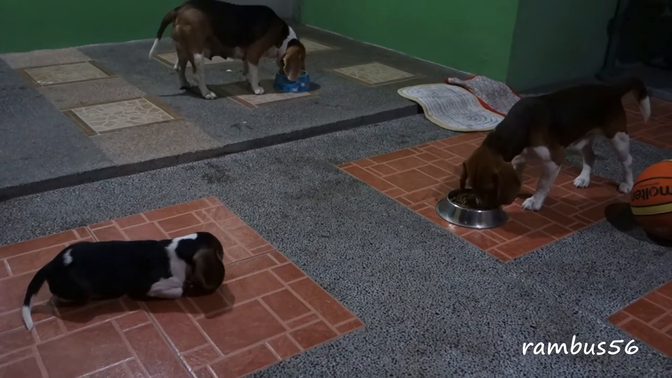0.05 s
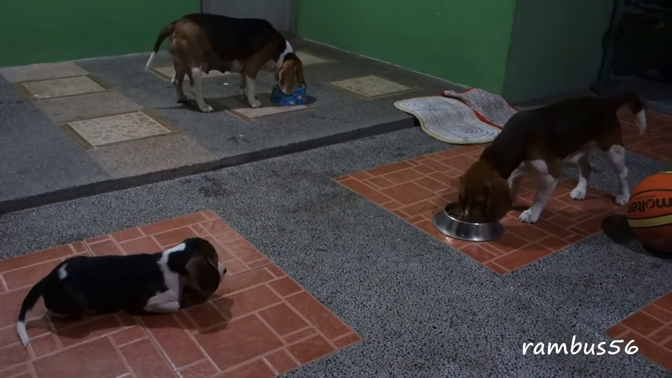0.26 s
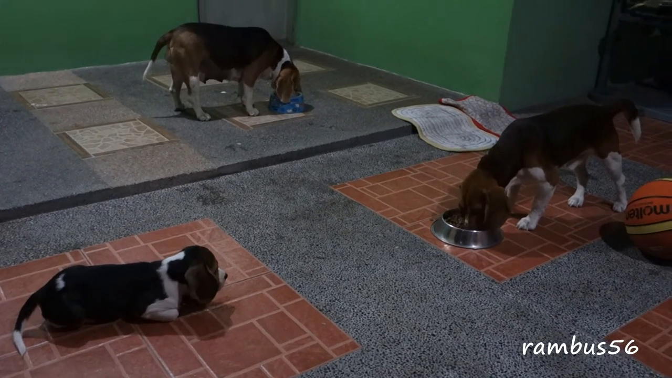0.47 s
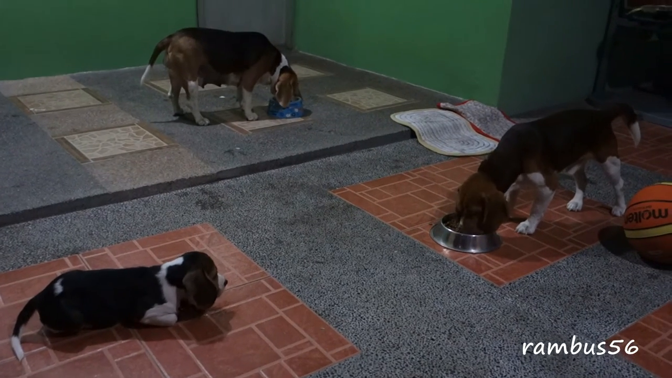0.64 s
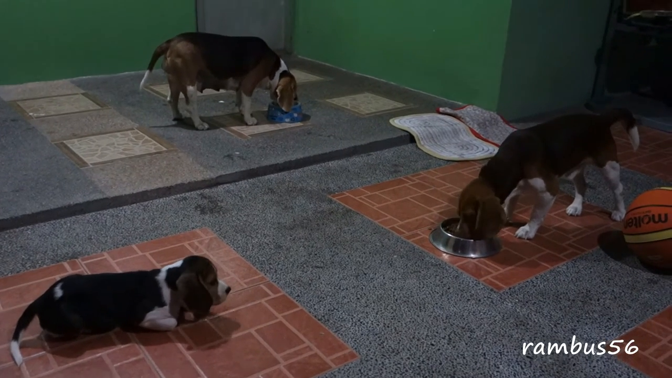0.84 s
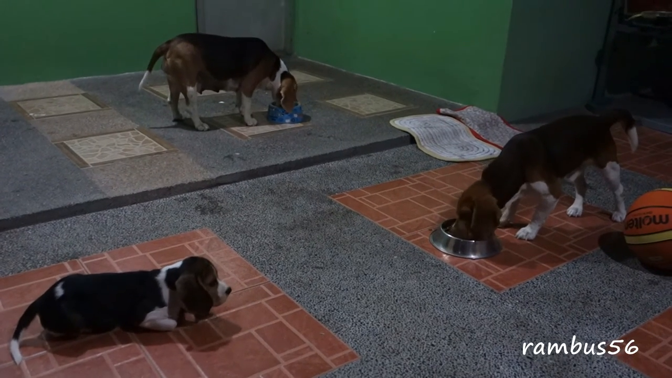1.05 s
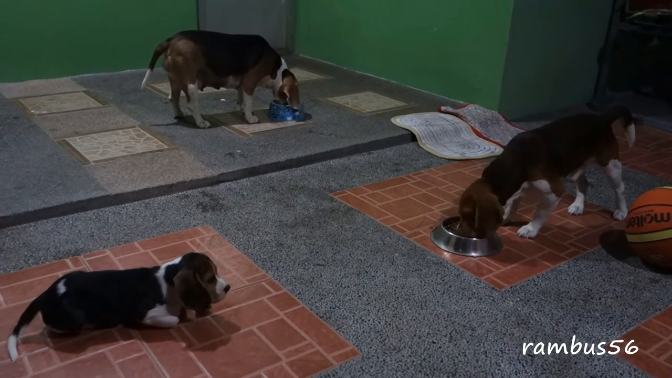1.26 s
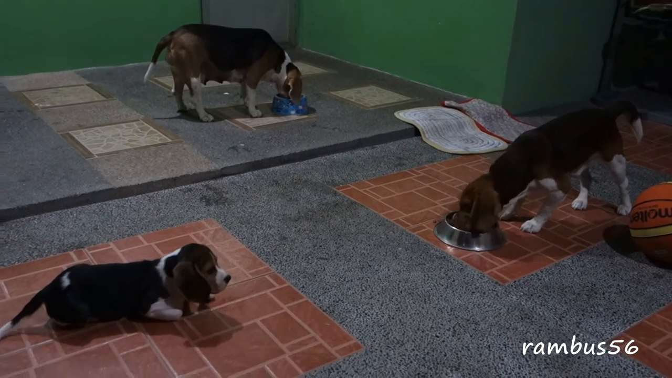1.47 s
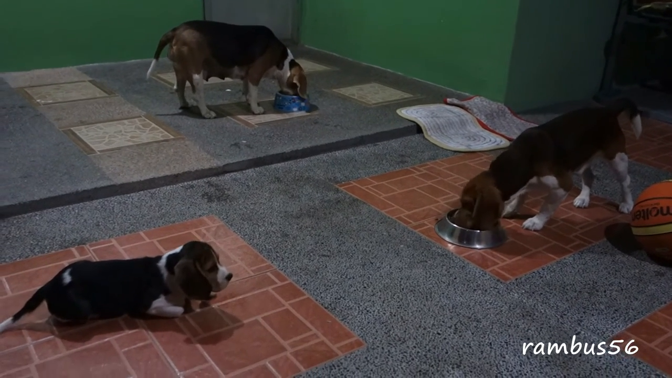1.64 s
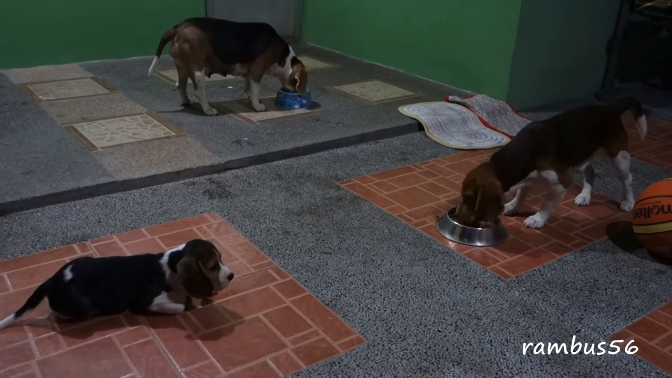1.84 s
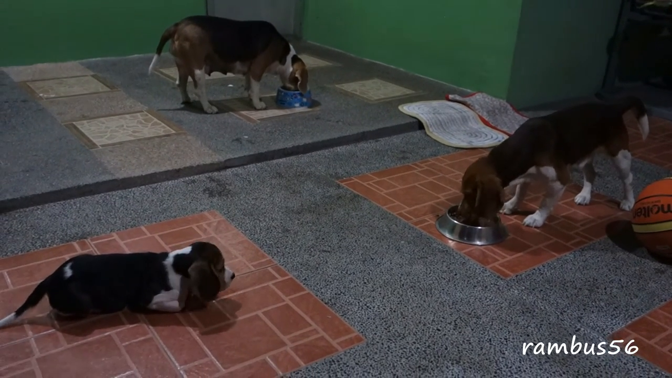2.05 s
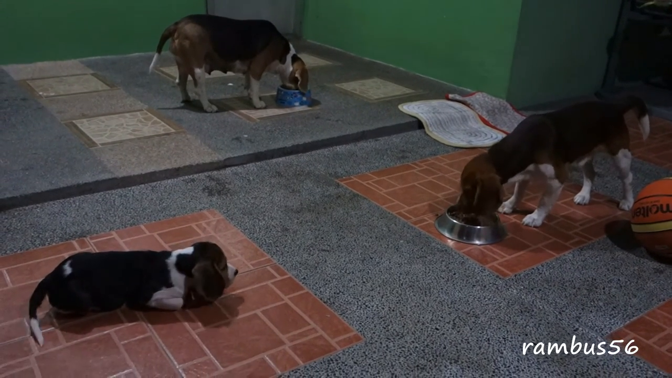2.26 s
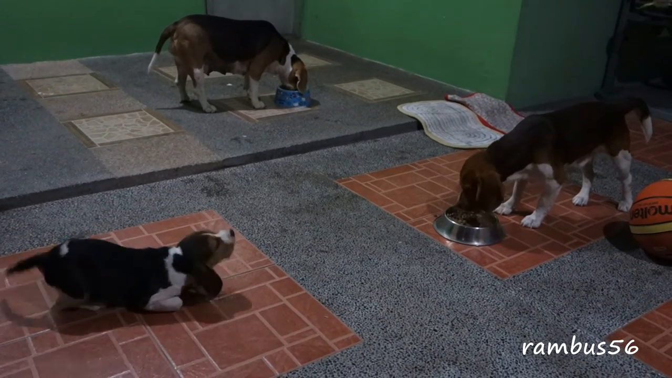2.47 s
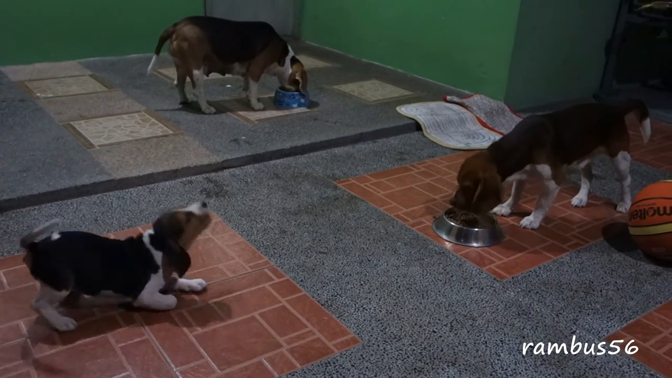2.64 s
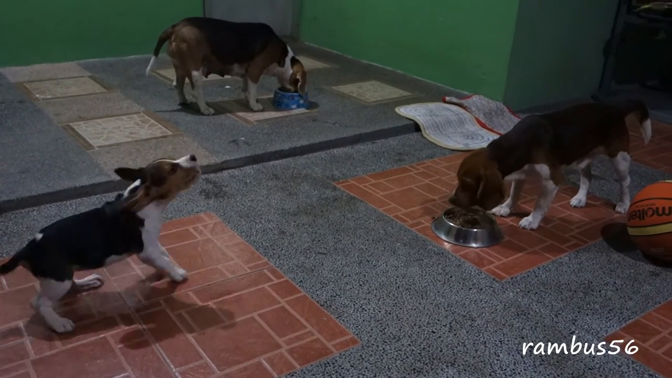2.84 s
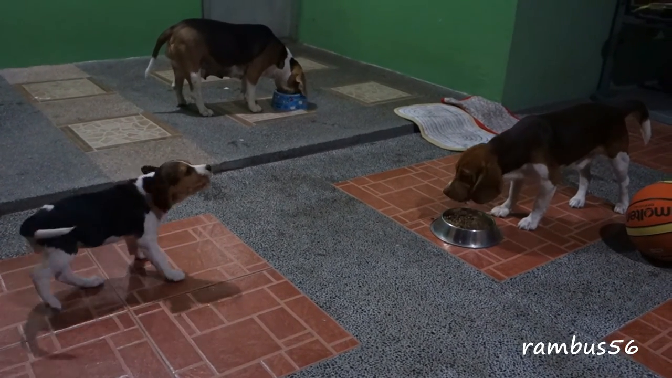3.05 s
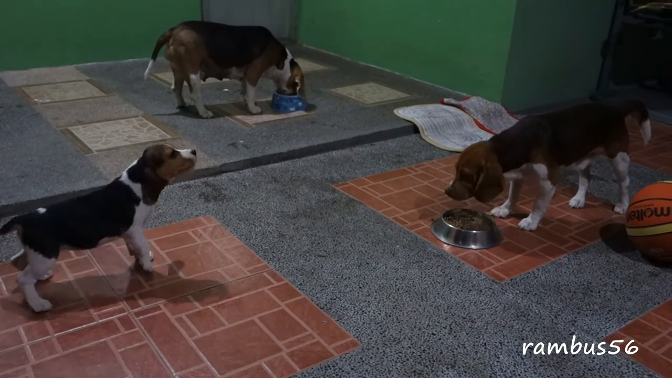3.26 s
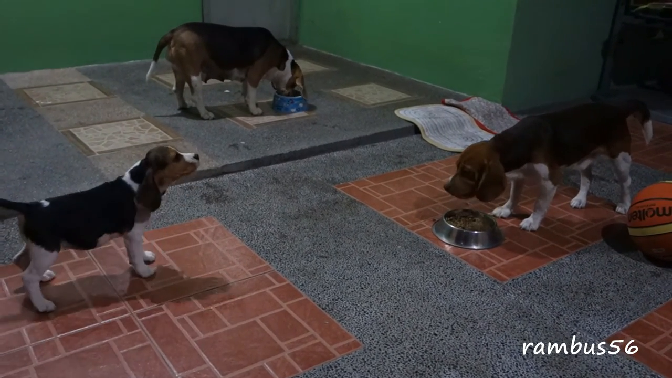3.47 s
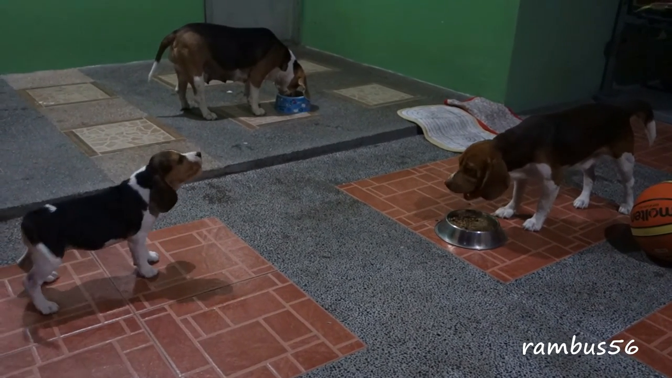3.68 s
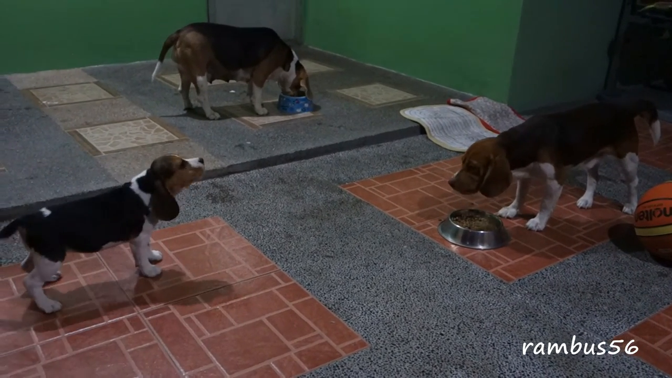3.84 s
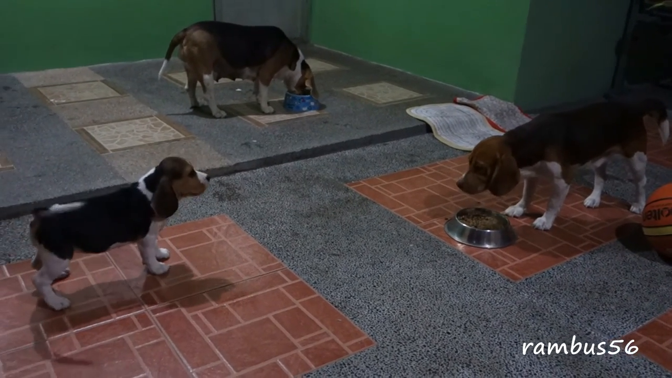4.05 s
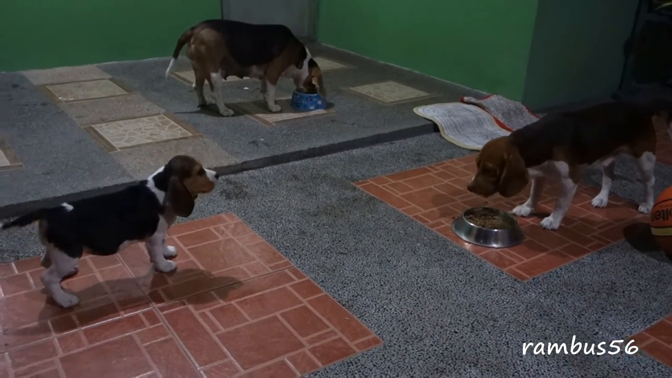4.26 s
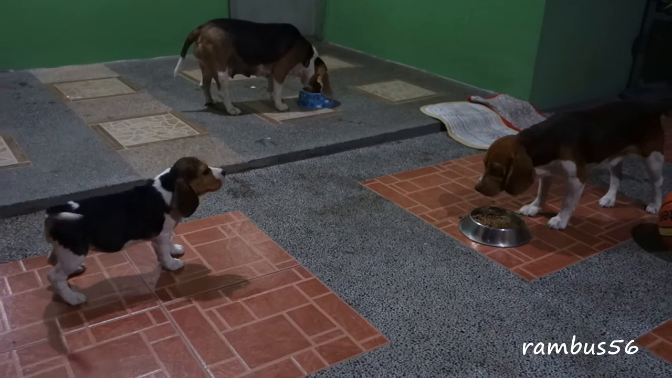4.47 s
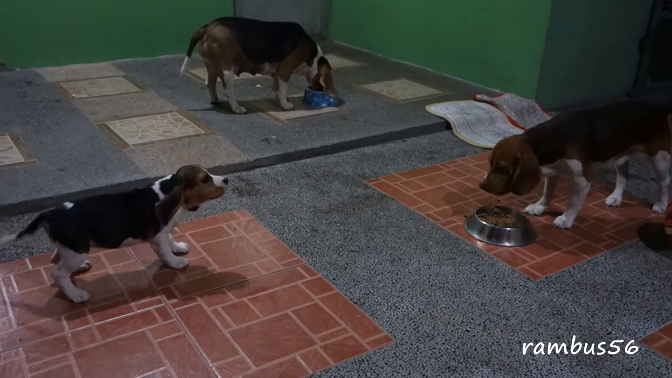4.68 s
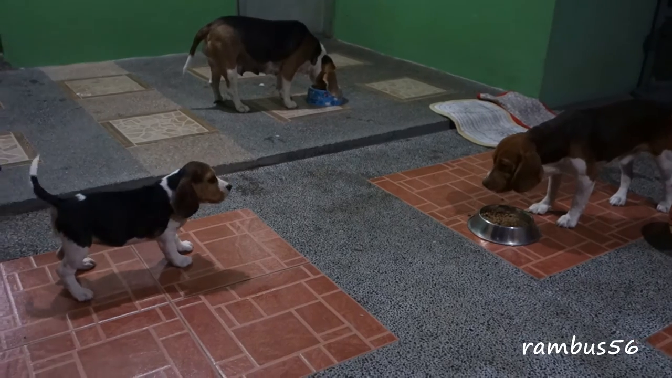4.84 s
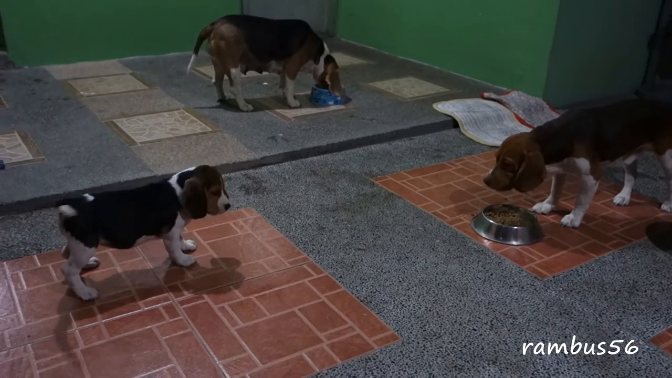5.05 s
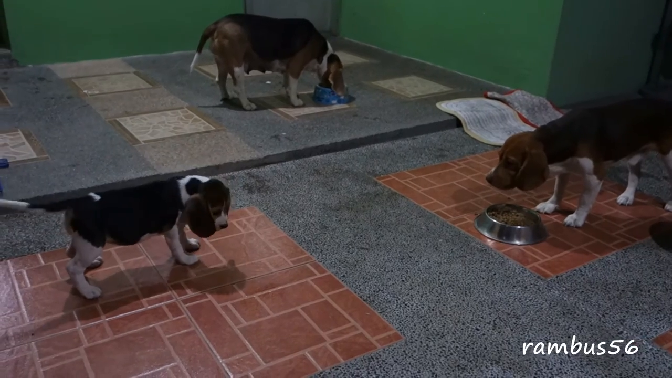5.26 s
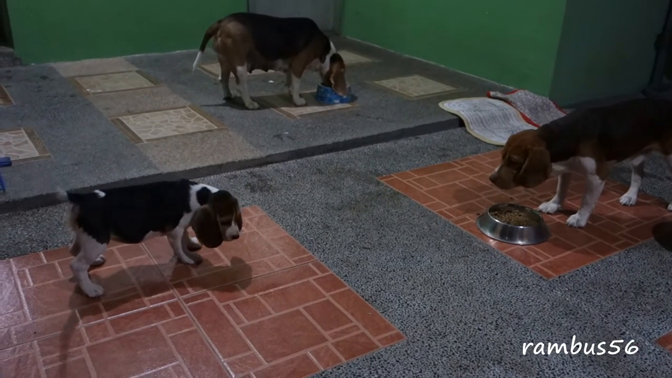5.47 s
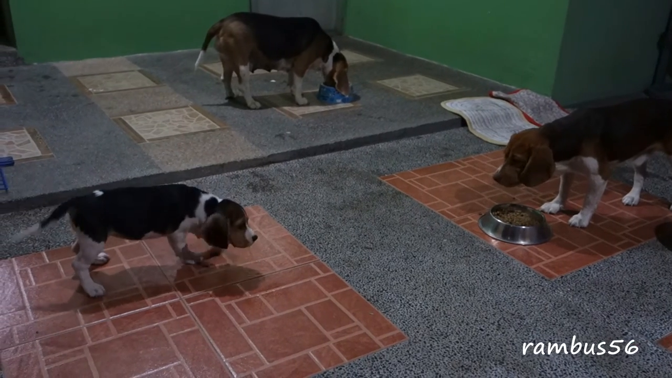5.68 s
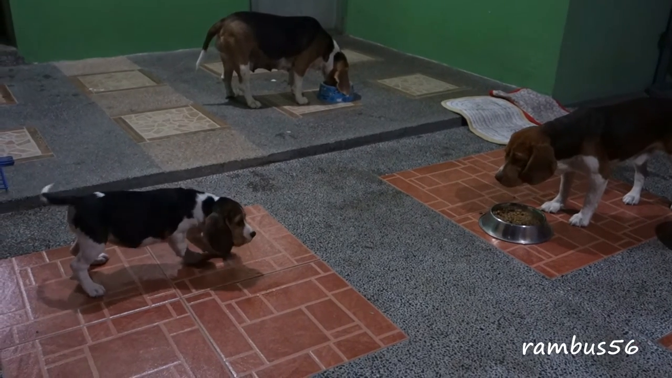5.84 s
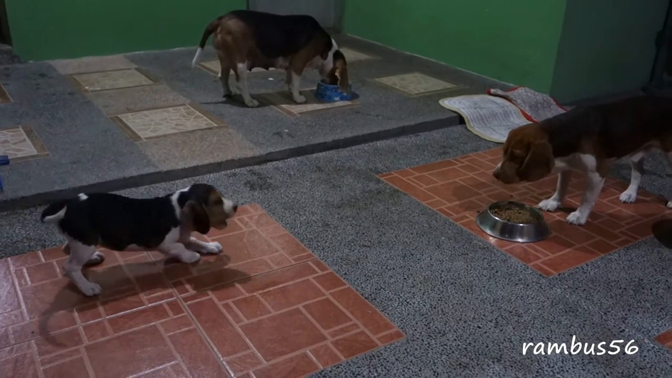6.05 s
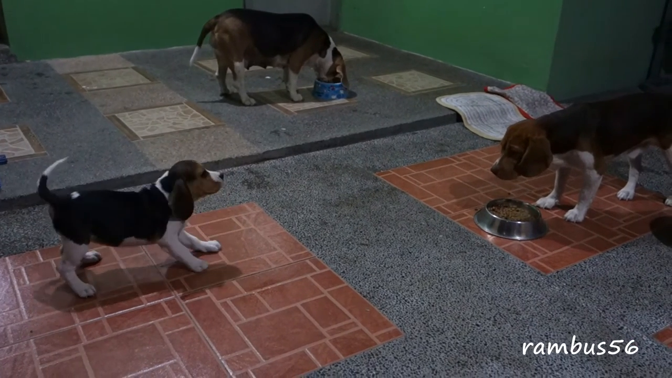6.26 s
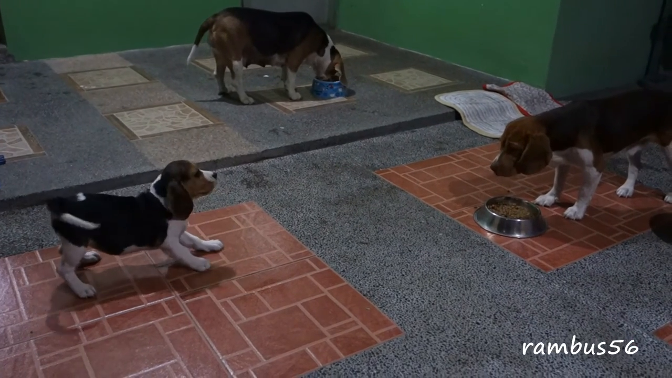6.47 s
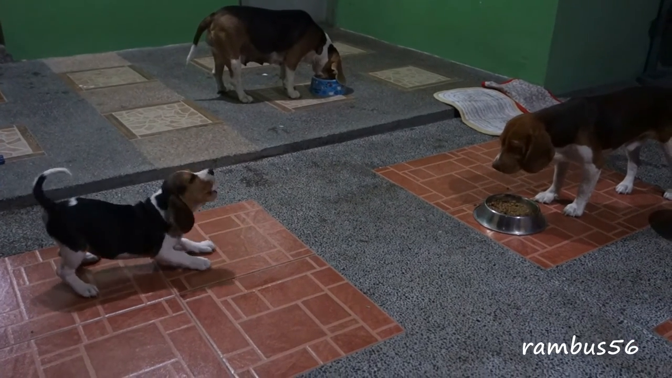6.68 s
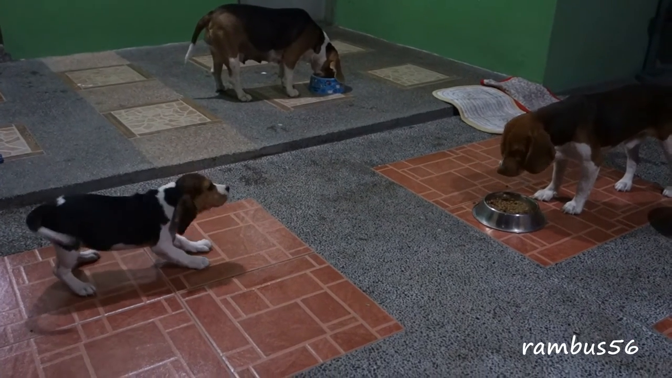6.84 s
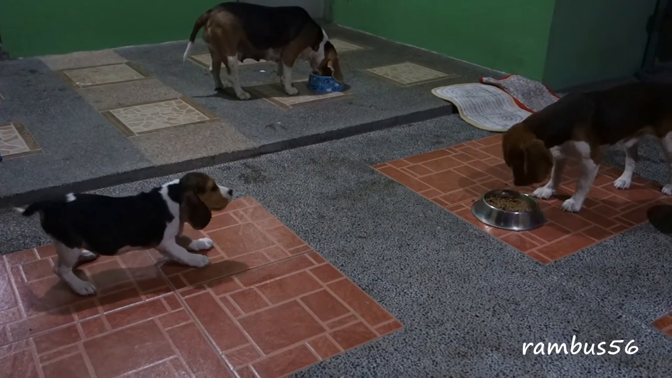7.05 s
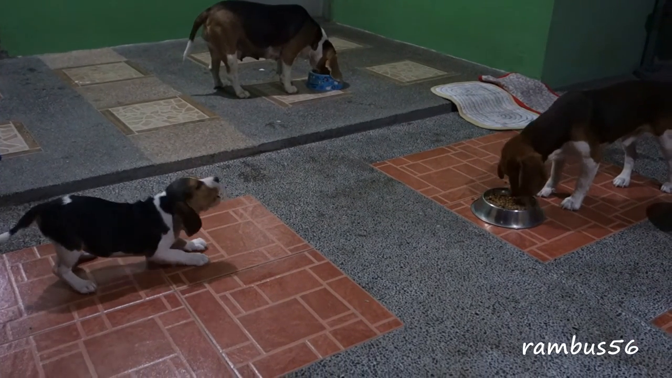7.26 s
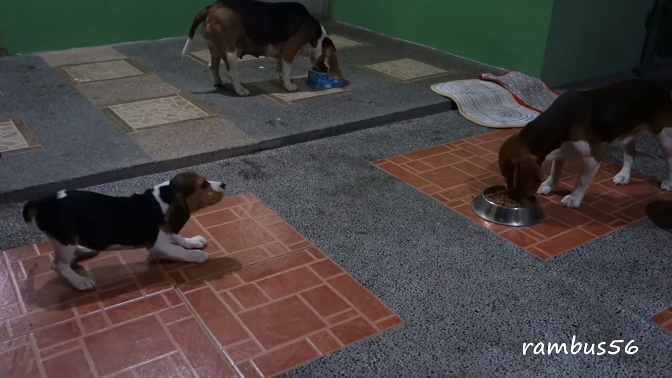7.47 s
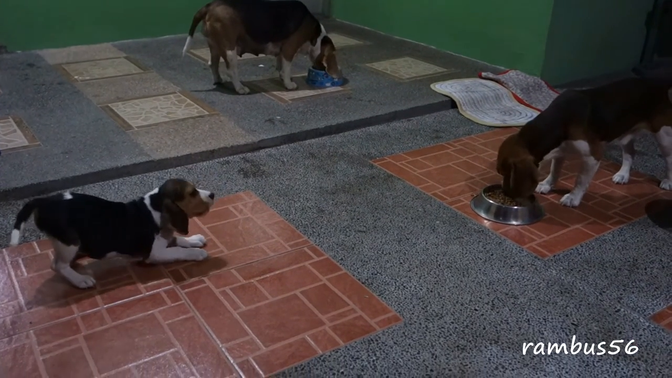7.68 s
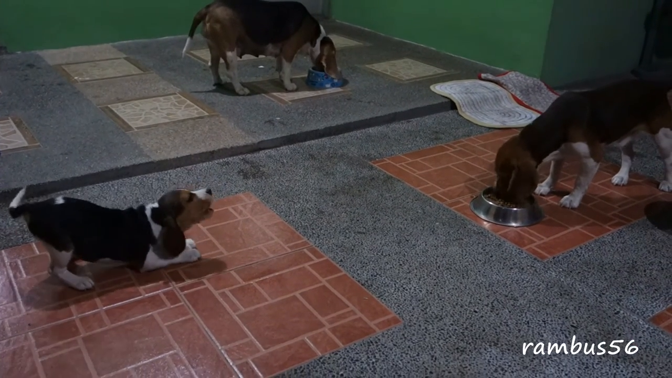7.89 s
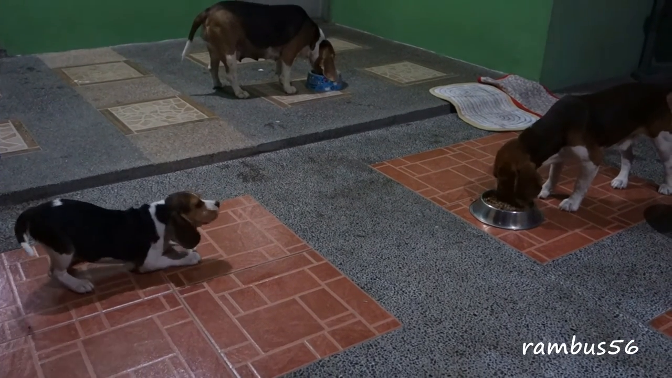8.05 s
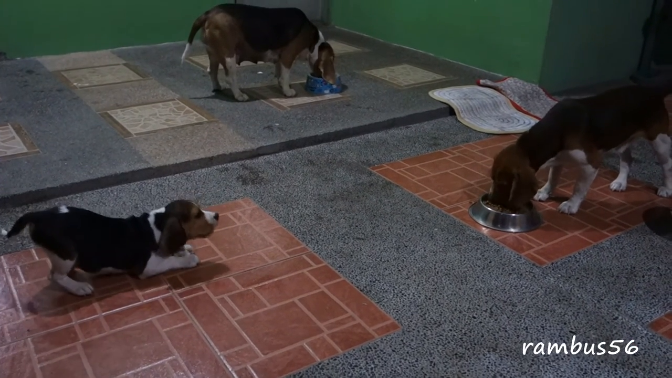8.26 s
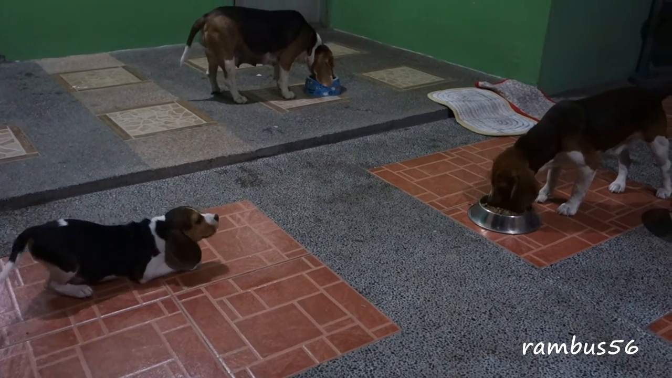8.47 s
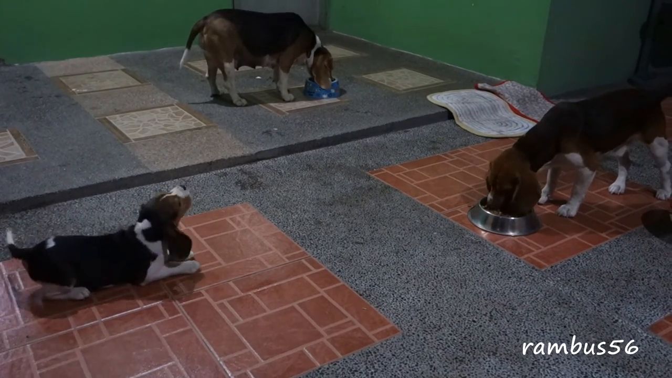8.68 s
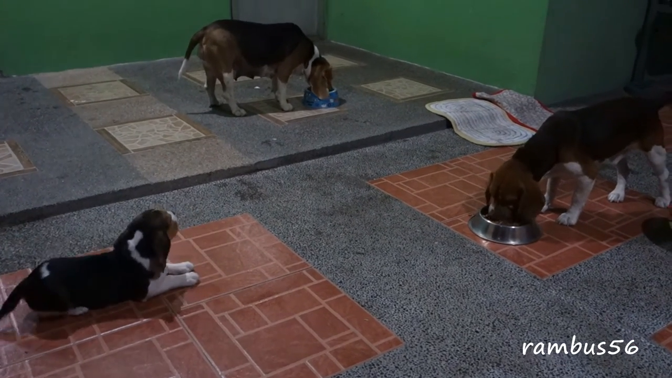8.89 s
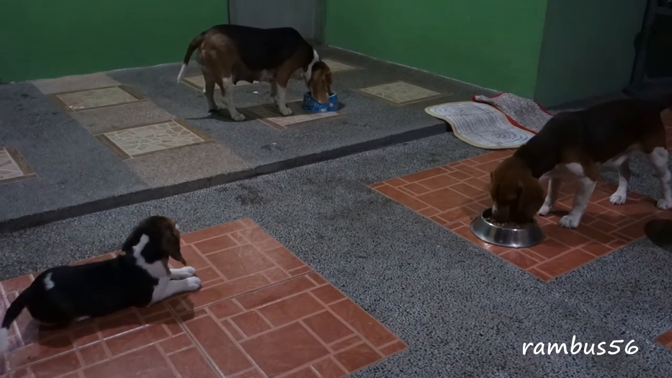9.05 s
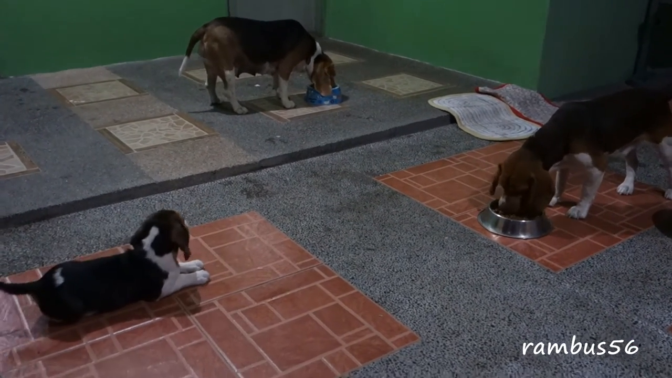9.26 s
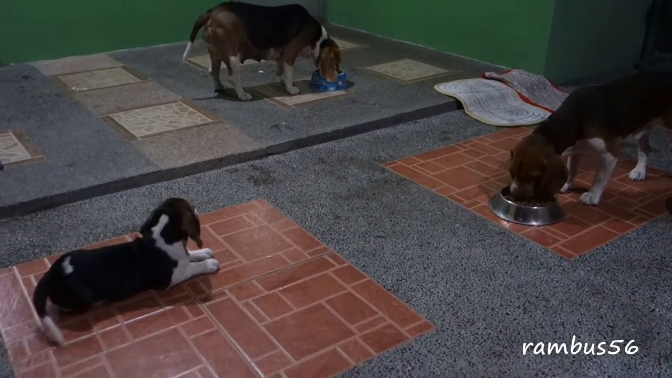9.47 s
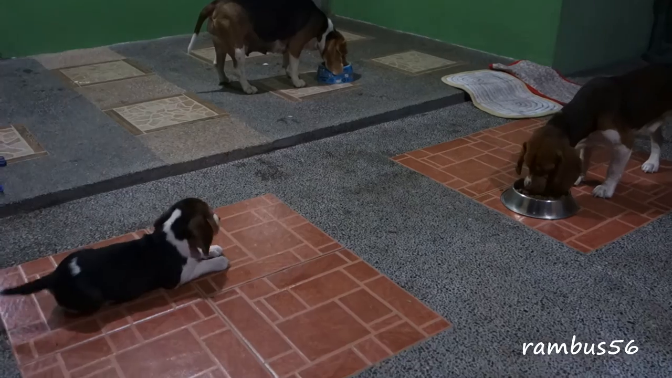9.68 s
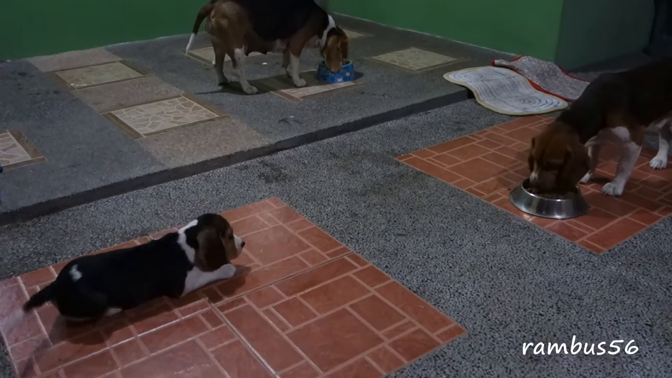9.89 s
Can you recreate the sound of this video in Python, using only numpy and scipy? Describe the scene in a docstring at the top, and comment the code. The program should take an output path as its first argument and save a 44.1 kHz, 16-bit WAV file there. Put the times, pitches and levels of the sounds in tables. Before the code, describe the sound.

A quiet bed of distant town noise, faint hum and microphone hiss runs throughout. For the first two seconds, dogs eat with faint chewing and a few light taps on bowl and floor, with a small steel clink at about 1.4 seconds. From 2.4 to 3.2 seconds a puppy gives a loud, quick run of high barks with a brief howled note among them. Single barks follow at about 3.6, 4.4, 5.5, 6.0, 6.6, 7.2 and 7.8 seconds, with soft, quick breaths between several. They scoop up in pitch, most collapse into a hoarse grunt, and all ring off the yard's hard walls. At 8.5 seconds a last bark rises into a short, higher howl. The background dips slightly under the barks and creeps back. Faint chewing continues, with a few more bowl taps between 9.3 and 9.8 seconds.

```python
"""Puppy barking in a night yard

A puppy barks and briefly howls between hard walls while two older dogs eat from their bowls.
Each bark is one gesture: the pitch scoops up, holds, then collapses into a hoarse grunt, and the
walls ring on. The camera's gain control ducks the quiet bed of distant town and hiss under the
barks and lets it creep back."""
import sys
import numpy as np
from scipy import signal
from scipy.fft import rfft, irfft, next_fast_len
from scipy.io import wavfile
from scipy.ndimage import uniform_filter1d, map_coordinates

SR = 44100
rng = np.random.default_rng(int(sys.argv[2]) if len(sys.argv) > 2 else 0)


def dump(signal):
    """Clip the signal to [-1, 1] and save it as 16-bit WAV at the path in sys.argv[1]."""
    limited = np.clip(np.atleast_2d(signal).T, -1, 1)
    pcm = np.round(limited * 32767).astype(np.int16)
    wavfile.write(sys.argv[1], SR, pcm)


N = 437472
TIME = np.arange(N) / SR
TOP_HZ = 14200  # band limit


def amp(db):
    """Decibels to gain."""
    return 10 ** (np.asarray(db) / 20)


def unit(x):
    """x at rms 1."""
    return x / np.sqrt(np.mean(x ** 2) + 1e-20)


def along(points, hz):
    """Read a curve of (frequency, value) points on a log axis."""
    freqs, values = np.transpose(points)
    return np.interp(np.log(hz + 1), np.log(freqs + 1), values)


def wobble(count, rate):
    """A smooth random curve with rate knots a second."""
    return map_coordinates(rng.standard_normal(size=1024), [np.arange(count) * rate / SR], mode="wrap")


def filtered(x, response):
    """EQ x with a gain given as a function of frequency."""
    n = x.shape[-1]
    padded = next_fast_len(n + 4096)
    return irfft(rfft(x, padded) * response(np.fft.rfftfreq(padded, 1 / SR)), padded)[..., :n]


def add(track, start_s, x):
    """Mix x into the track from start_s on."""
    i = max(round(start_s * SR), 0)
    track[..., i:i + x.shape[-1]] += x[..., :N - i]


def band(count, centre, q):
    """Noise of rms 1 in one resonance with steep skirts."""
    resonance = lambda hz: 1 / (1 + (q * (hz / centre - centre / (hz + 1))) ** 2)
    return unit(filtered(rng.standard_normal(count), resonance))


# Stereo image of diffuse sound: (frequency [Hz], left-right correlation [0-1])
DIFFUSE_IMAGE = [(150, 1), (600, 0.96), (1300, 0.66), (2800, 0.22), (6500, 0.039)]

def diffuse(count):
    """White noise from all sides: centred in the bass, wide in the treble."""
    spread = lambda hz: np.arccos(np.clip(along(DIFFUSE_IMAGE, hz), -1, 1)) / 2
    mid, side = rng.standard_normal((2, count))
    mid = filtered(mid, lambda hz: np.cos(spread(hz)))
    side = filtered(side, lambda hz: np.sin(spread(hz)))
    return np.array([mid + side, mid - side])


# Ring of the hard walls: (frequency [Hz], time to fall 60 dB [s])
WALL_DECAY = [(150, 0.66), (700, 0.71), (2200, 0.75), (5000, 0.69), (10000, 0.53)]

def yard(x, wet_db, build_s=0.0017):
    """Direct sound plus the walls' answer; each call draws a fresh tail, as for a new source position."""
    hz, t, spectrum = signal.stft(diffuse(SR), SR, nperseg=256)
    decay = amp(-60 * t / along(WALL_DECAY, hz)[:, None])
    tail = signal.istft(spectrum * decay, SR, nperseg=256)[1]
    tail *= 1 - np.exp(-np.arange(tail.shape[1]) / SR / build_s)
    response = amp(wet_db) * tail / np.linalg.norm(tail[0])
    response[:, 0] += 1  # direct path
    return signal.fftconvolve(x[None], response / np.linalg.norm(response[0]), axes=1)


# Colour of the distant town: (frequency [Hz], relative level [dB])
TOWN_EQ = [(18, -85.5), (30, -25.5), (175, -3), (218, -4.5), (411, -5.5), (608, -7), (790, -6), (1140, -3),
           (2560, -11.5), (2860, -14.5), (3970, -17.5), (5500, -24.5), (7150, -59), (12100, -120)]
# Colour of the camera's hiss: (frequency [Hz], relative level [dB])
HISS_EQ = [(3000, -37), (6200, -5.5), (6800, 6.5), (8000, 1), (8400, -4.5), (10500, -4.5), (11300, 3.5),
           (12500, 1), (14000, -35.5)]

def night_bed(town_db=-49.5, hiss_db=-51, hum_hz=174, hum_db=-67.5, whine_hz=3370, whine_db=-69):
    """Distant town noise, a wavering hum, a faint thin whine and the camera's own hiss."""
    town = unit(filtered(diffuse(N), lambda hz: amp(along(TOWN_EQ, hz)) * hz / np.hypot(hz, 70)))
    town *= amp(0.4 * wobble(N, 1.7))
    hum = np.sqrt(2) * np.sin(2 * np.pi * hum_hz * TIME + 0.32 * wobble(N, 44))
    hum *= amp(1.2 * wobble(N, 13))
    hiss = unit(filtered(rng.standard_normal((2, N)), lambda hz: amp(along(HISS_EQ, hz))))
    whine = band(N, whine_hz, q=22)
    return amp(town_db) * town + amp(hum_db) * hum + amp(whine_db) * whine + amp(hiss_db) * hiss


def tap(level_db, pitch_hz, t60_s=0.069, q=2.2):
    """One small impact: a noisy resonance that dies fast and echoes in the yard."""
    t = TIME[:SR // 4]
    return yard(amp(level_db - 60 * t / t60_s) * band(len(t), pitch_hz, q), wet_db=3.5)


# Teeth, kibble and claws on bowl and floor: (time [s], level [dB], pitch [Hz])
BOWL_TAPS = [(.053, -35.5, 1580), (0.061, -41, 424), (.671, -39, 9000), (0.703, -39, 8880),
             (1.349, -37.5, 1490), (1.536, -42, 9000), (1.979, -43.5, 8600), (2.15, -39, 900),
             (9.261, -36, 502), (9.672, -43, 1080), (9.799, -39, 1410)]

def feeding(chews=30, chew_db=-56, chew_hz=1200):
    """Two dogs at their bowls: a few clear taps over faint random chewing, and one clink of steel."""
    out = np.zeros((2, N))
    for start_s, level_db, pitch_hz in BOWL_TAPS:
        add(out, start_s, tap(level_db, pitch_hz))
    for when, size, tone in rng.random((chews, 3)):
        add(out, when * N / SR, tap(chew_db + 6 * (size - .5), chew_hz * 2 ** (2 * tone - 1)))
    add(out, 1.358, tap(-36.5, 2860, t60_s=0.057, q=9.3))  # the steel bowl rings
    return out


def gesture(rise, hold, fall, start_hz, top_hz, level_db, swell_db, held_rough, hoarse):
    """Time, pitch, level, roughness and jaw opening of one bark: scoop up, hold, collapse."""
    sag_oct_per_s, fall_oct_per_s = .35, 8.6
    t = np.arange(0, rise + hold + fall, 1 / SR)
    since_top = np.maximum(t - rise, 0)
    falling = np.maximum(t - rise - hold, 0)
    scoop = np.maximum(1 - t / rise, 0) ** 1.9  # fast at first, flat on top
    pitch = top_hz - (top_hz - start_hz) * scoop
    pitch *= 2 ** (-sag_oct_per_s * since_top - fall_oct_per_s * falling)
    push_db = level_db - swell_db * np.maximum(1 - t / (rise + hold), 0) ** 2
    push_db -= 17 * (falling / 0.089) ** 1.12  # the push dies away ever faster
    # the folds start hoarse and settle, break up again at the fall, then slacken to a grunt
    onset = 0.91 * np.exp(-(t / 0.031) ** 2)
    breakup = 0.96 * (1 - np.exp(-falling / 0.018)) * np.exp(-(falling / 0.19) ** 2)
    rough = np.clip(held_rough + (1 - held_rough) * hoarse * (onset + breakup), .01, .98)
    # the jaw snaps open and closes during the fall
    jaw = (1 - np.exp(-t / 0.0037)) * np.exp(-(falling / 0.058) ** 2)
    return t, pitch, push_db, rough, jaw


def vocal_folds(pitch, phase, rough, subharmonic_db=-8, rasp_db=-1):
    """The folds' buzz, from clean to chaotic, and their breathy rasp on its own."""
    harmonics = np.arange(1, 31)[:, None]

    def stack(orders):
        """Overtones, each delayed differently by the throat."""
        offsets = 2 * np.pi * rng.random(orders.shape)
        return unit(np.sum(np.cos(orders * phase + offsets) * (harmonics * pitch < TOP_HZ), 0))

    clean = stack(harmonics)
    subharmonics = stack(harmonics + .5)  # from alternating strong and weak cycles
    # air rasps through the folds once a cycle
    puffs = unit(rng.standard_normal(SR)[:len(phase)] * (1 + 0.42 * np.cos(phase)))
    rasp = filtered(puffs, lambda hz: hz ** 2 / np.hypot(hz ** 2, 560 ** 2) / np.hypot(1, hz / 7000))
    growl = amp(subharmonic_db) * subharmonics + amp(rasp_db) * rasp
    return np.sqrt(1 - rough) * clean + np.sqrt(rough) * growl, rasp


# Body tone of throat and muzzle: (frequency [Hz], gain [dB])
THROAT_EQ = [(100, -5), (280, -12), (450, -3), (600, 2.5), (850, 4), (1250, 4), (1850, 5.5), (2200, -4),
             (2520, 2.5), (2800, -2), (3130, 1), (3500, -5.5), (4000, -6), (4350, -1.5), (5000, -8.5),
             (14000, -45)]

def vocal_tract(buzz, rasp, jaw, throat_hz, throat_db, mouth_hz, mouth_db, edge_hz):
    """Throat and mouth add two resonances to the body tone; the closing jaw darkens it."""
    def response(hz, cutoff_hz):
        bump = lambda centre: np.exp(-(np.log((hz + 1) / centre) / 0.12) ** 2)
        lift_db = throat_db * bump(throat_hz) + mouth_db * bump(mouth_hz)
        return amp(along(THROAT_EQ, hz) + lift_db) / np.sqrt(1 + (hz / cutoff_hz) ** 11)

    wide = filtered(buzz, lambda hz: response(hz, edge_hz))
    narrow = filtered(buzz, lambda hz: response(hz, 0.66 * edge_hz))
    # a little rasp passes even a shut mouth
    leak = filtered(rasp, lambda hz: amp(along(THROAT_EQ, hz) - 22.5) / np.hypot(1, (hz / 3630) ** 8))
    return jaw * wide + (1 - jaw) * narrow + leak


# Airy top end at the teeth: (frequency [Hz], relative gain [dB])
TEETH_EQ = [(4000, -59), (5200, -43), (6200, -27.5), (7400, -36), (8500, -17), (10000, -12), (11500, -21.5),
            (13500, -39.5)]

def teeth_sizzle(buzz, t, onset_rough, edge_hz, whistle_hz=10400):
    """Air at the teeth: a wide mouth sizzles more, a nearly shut one narrows it to a thin whistle."""
    opening_db = 7.5 * np.log2(edge_hz / 2900) - 3
    shut = np.clip(1 - edge_hz / 2600, 0, 1)
    whistle_db = lambda hz: 28 * shut * (np.exp(-((hz - whistle_hz) / 450) ** 2) - .58)
    sizzle = filtered(buzz, lambda hz: amp(along(TEETH_EQ, hz) + opening_db + whistle_db(hz)))
    # the rush of air builds in a moment, spits hardest at first, then flutters
    build = 1 - np.exp(-t / 0.0033)
    spit_db = 9 * onset_rough * np.exp(-(t / 0.04) ** 4)
    flutter_db = 4 * wobble(len(t), 65.4)
    return build * amp(spit_db + flutter_db) * sizzle


def bark(course, mouth, attack_s=0.0088, release_s=0.018, chest_hz=326):
    """One dry bark: the folds sound through throat, mouth, chest and teeth."""
    t, pitch, push_db, rough, jaw = gesture(*course)
    pitch *= 1 + (.0015 + .028 * rough) * wobble(len(t), 260)  # hoarse folds swing unevenly
    phase = 2 * np.pi * np.cumsum(pitch) / SR
    effort = amp(push_db) * np.clip(t / attack_s, 0, 1) * np.clip((t[-1] - t) / release_s, 0, 1)
    buzz, rasp = vocal_folds(pitch, phase, rough)
    voice = vocal_tract(effort * buzz, effort * rasp, jaw, *mouth)
    # the chest sounds the fundamental once the pitch sinks low
    chest = amp(-9) * effort * np.sin(phase) / (1 + (pitch / chest_hz) ** 8)
    sizzle = teeth_sizzle(effort * buzz, t, rough[0], edge_hz=mouth[-1])
    return unit(voice + chest + sizzle) * np.sqrt(np.mean(effort ** 2))


# Barks and howled notes: (time [s], rise [s], hold [s], fall [s], start pitch [Hz], top pitch [Hz],
# relative level [dB], swell [dB], held roughness [0-1], hoarseness of both ends [factor],
# throat resonance [Hz], throat lift [dB], mouth resonance [Hz], mouth lift [dB], open-mouth edge [Hz])
BARK_CUES = [ (2.368, 0.074, 0.061, 0.13, 375.3, 599.6, -4.5, 7, 0.65, 0.44, 810, 6.5, 1970, 3, 2450),
             (2.597, 0.056, 0.034, 0.099, 482, 617.6, 1.5, 13, 0, 0.35, 1196, 5, 1760, 0, 1450),
             (2.808, .01, .095, 0.032, 799, 824, -3, -6.5, 0.15, 0.4, 810, 4, 1700, -2.5, 1350),
             (2.934, .112, .025, .15, 389.2, 551.2, -4, 4.5, 0.09, .5, 994, 11, 503, 6, 1444),
             (3.627, 0.088, 0.042, 0.091, 415.8, 625.3, -0.5, 10, 0.07, 0.56, 1407, 9.5, 1860, 5.5, 2260),
             (4.445, 0.086, 0.062, 0.038, 411.7, 650.7, 1.5, 10.5, 0.12, 0.84, 1474, 9.5, 2000, 8, 2560),
             (5.476, 0.069, 0.049, 0.035, 600, 648.8, -5.5, 0.5, .46, 1.04, 960, 8.5, 603, 8.5, 3260),
             (5.991, .06, .075, 0.123, 477.5, 636.7, 1, 8.5, 0.12, 1.04, 1960, 5, 2640, 8.5, 3080),
             (6.618, .065, 0.051, 0.12, 477.2, 617.6, -1, 2.5, 0.07, .9, 937, 11, 1940, 7.5, 2810),
             (7.188, .1, 0.061, 0.11, 465.6, 634.6, 0.5, 8.5, 0.11, 1, 1384, 6.5, 2590, 10, 3140),
             (7.809, 0.071, 0.072, .08, 471.6, 625.2, -1, 2, .03, 0.83, 1717, 5.5, 2600, 11.5, 2910),
             (8.451, .08, 0.0064, 0.0037, 421, 700.7, -6, 8.5, 0.25, 0.65, 860, 7, 2720, 15.5, 2940),
             (8.529, .02, 0.063, 0.039, 785.4, 849, -4, -5.5, 0.08, 0.42, 850, 9, 2630, 7, 3070), ]

def barking():
    """The puppy's barks and brief howl, ringing off the walls."""
    out = np.zeros((2, N))
    for cue in BARK_CUES:
        add(out, cue[0], yard(bark(course=cue[1:10], mouth=cue[10:]), wet_db=4.5))
    return out


# Quick breaths between barks: (time of peak [s], level [dB])
GASP_CUES = [(3.517, -48.5), (4.22, -60), (5.85, -38.5), (7.051, -39.5), (7.65, -37.5), (8.316, -47.5)]

def gasps(length_s=.31, centre_hz=4300):
    """The puppy draws air through its open mouth: a soft swell of hiss."""
    out, n = np.zeros((2, N)), int(length_s * SR)
    for peak_s, level_db in GASP_CUES:
        breath = amp(level_db) * np.hanning(n) * band(SR, centre_hz, q=0.77)[:n]
        add(out, peak_s - length_s / 2, yard(breath, wet_db=3))
    return out


# Hoots that lead into some barks: (time [s], start pitch [Hz], relative level [dB])
HOOT_CUES = [(5.987, 698, -14), (7.187, 682, -13.5), (7.803, 695, -12), (8.428, 596, -20.5),
             (8.456, 637, -11.5)]

def hoots(length_s=.036, glide=0.21):
    """The still narrow mouth gives a short, breathy tone that rises as the jaw drops."""
    out = np.zeros((2, N))
    progress = np.arange(int(length_s * SR)) / (length_s * SR)
    envelope = np.sqrt(np.sin(np.pi * progress))
    for start_s, pitch_hz, level_db in HOOT_CUES:
        tone = np.sqrt(2) * np.sin(2 * np.pi * np.cumsum(pitch_hz * (1 + glide * progress)) / SR)
        breath = band(len(progress), pitch_hz, q=2.37)
        add(out, start_s, yard(amp(level_db) * envelope * (tone + breath), wet_db=-4))
    return out


# Treble tilt between the microphone ports: (frequency [Hz], right boost and left cut [dB])
STEREO_TILT = [(2500, -0.1), (4500, 0), (6500, 2.5), (8500, 6.5), (10500, 6.5), (12500, 1.5)]

def scene(voice_db=-4):
    """The yard at the two microphone ports; the right one is brighter."""
    mix = amp(voice_db) * (barking() + hoots()) + gasps() + feeding() + night_bed()
    return filtered(mix, lambda hz: amp(np.outer([-1, 1], along(STEREO_TILT, hz))))


def record(dry, threshold_db=-12.5, window_s=.012, fast_db_per_s=30, slow_db_per_s=4.5, slow_share=0.71):
    """Gain control clamps at once, lets go a little quickly and the rest slowly; then overload."""
    power = np.abs(uniform_filter1d(np.mean(dry ** 2, 0), int(window_s * SR)))
    excess_db = np.maximum(10 * np.log10(power + 1e-12) - threshold_db, 0)
    release = lambda rate: np.maximum.accumulate(excess_db + rate * TIME) - rate * TIME
    cut_db = np.maximum(release(fast_db_per_s), slow_share * release(slow_db_per_s))
    ducked = dry * amp(-uniform_filter1d(cut_db, size=128))
    # a slightly lopsided input stage puts faint difference tones under loud barks
    bent = ducked + amp(-29) * ducked.mean(0) ** 2
    clipped = bent / (1 + np.abs(bent / .92) ** 10) ** .1
    return filtered(clipped, lambda hz: (hz < TOP_HZ) * hz / np.hypot(hz, 25))  # high and low cut


dry = scene()
out = record(dry)
dump(out)
```